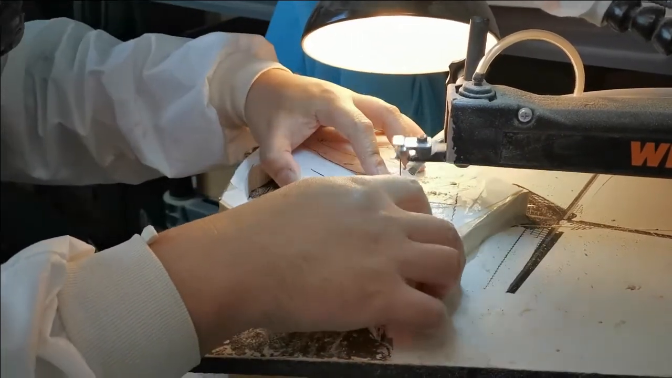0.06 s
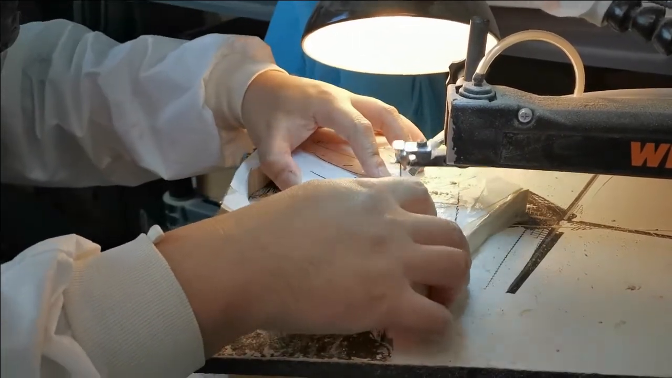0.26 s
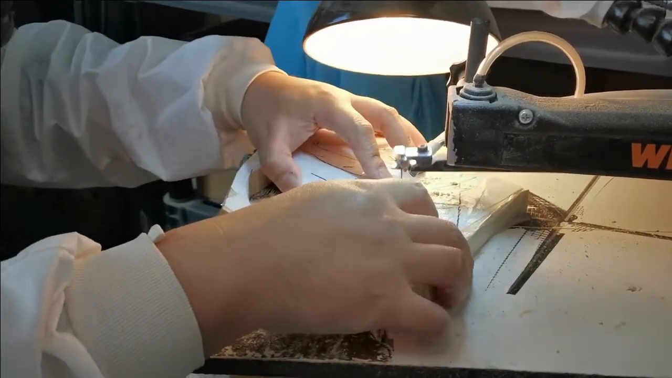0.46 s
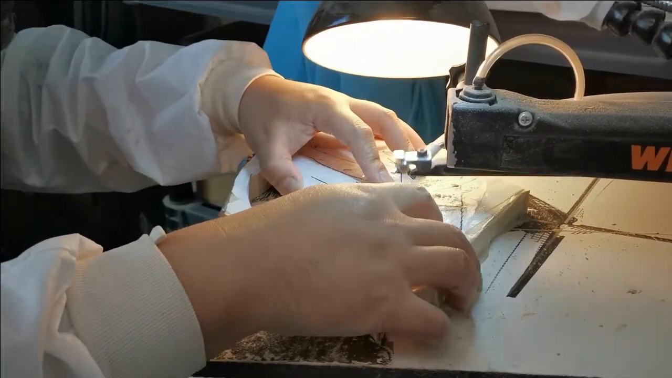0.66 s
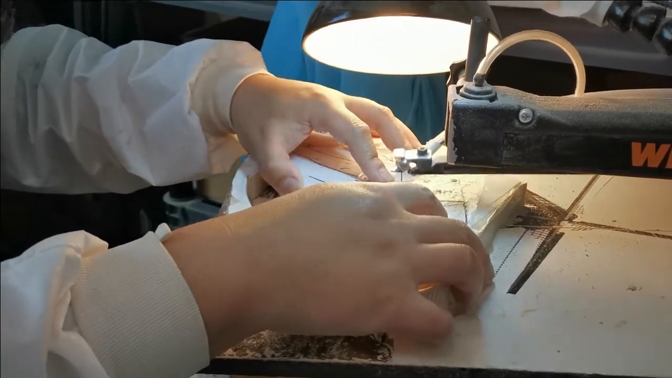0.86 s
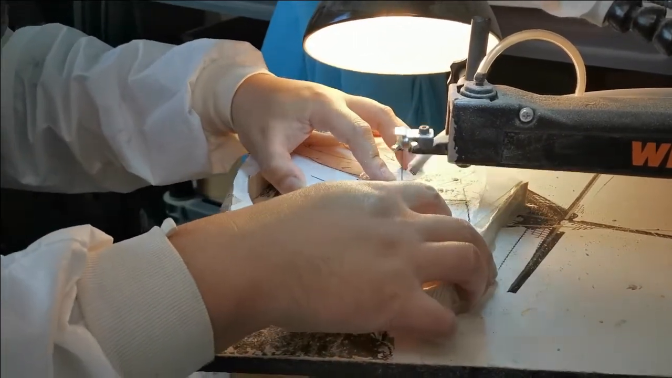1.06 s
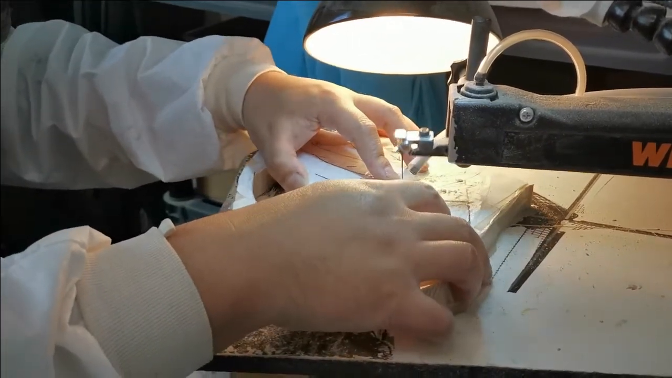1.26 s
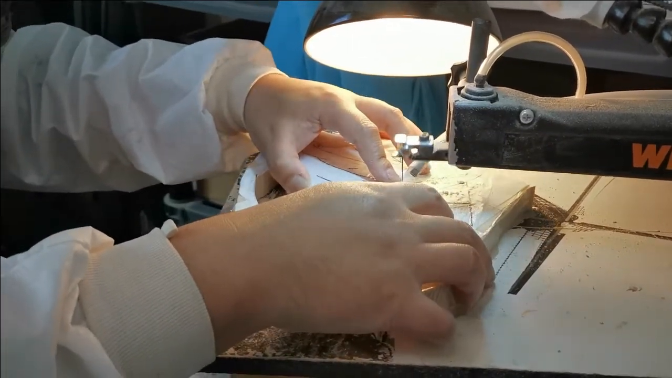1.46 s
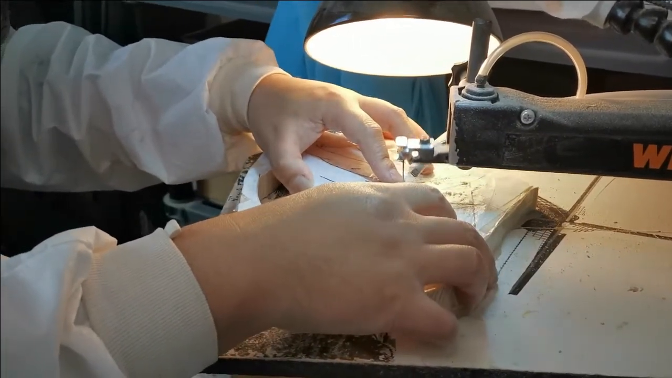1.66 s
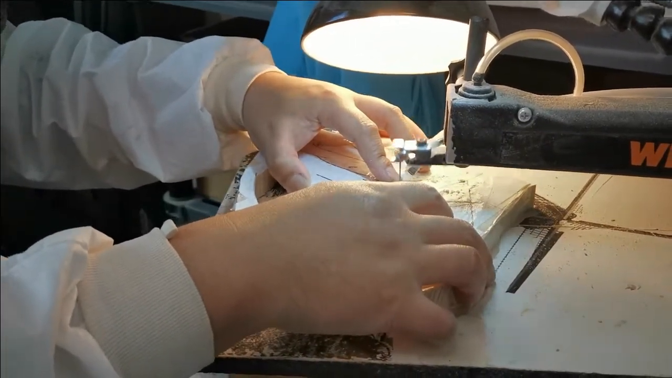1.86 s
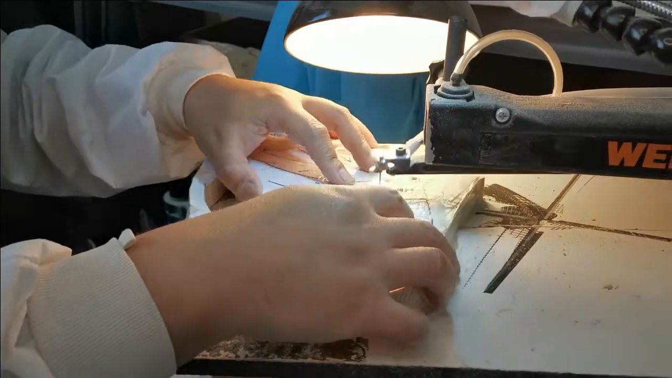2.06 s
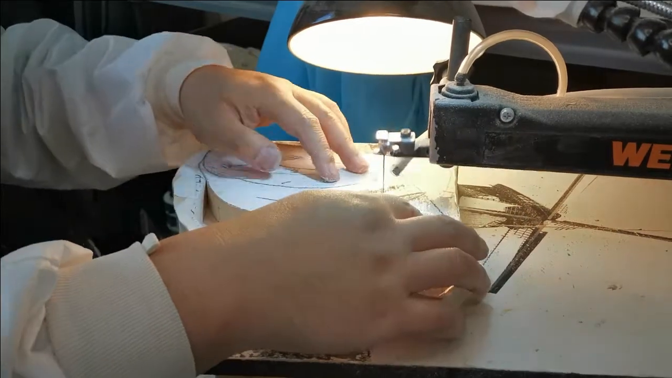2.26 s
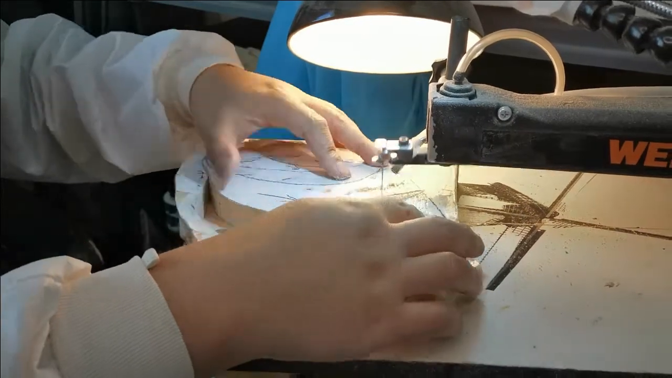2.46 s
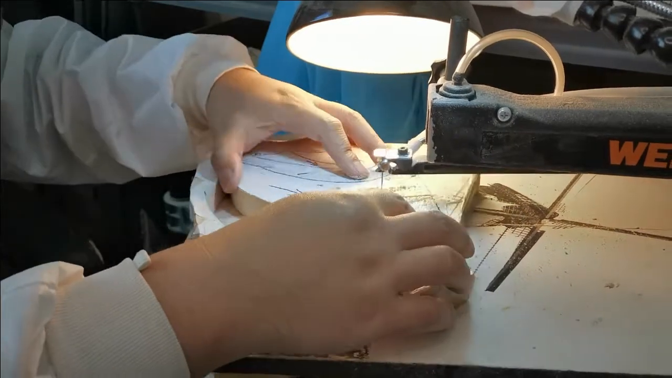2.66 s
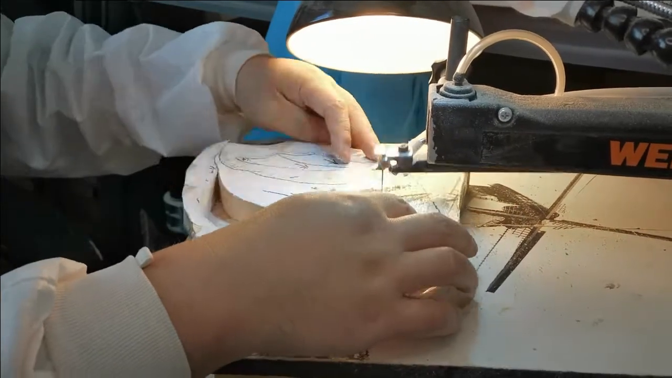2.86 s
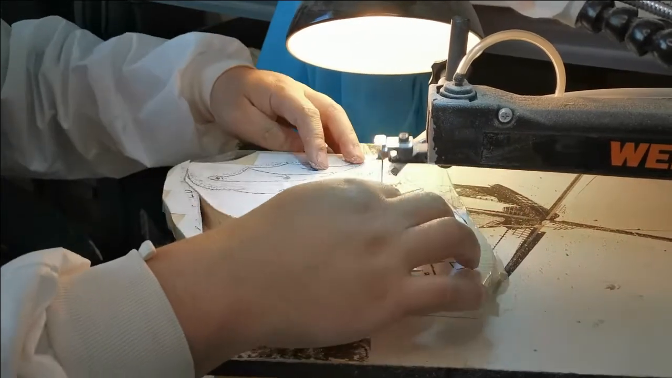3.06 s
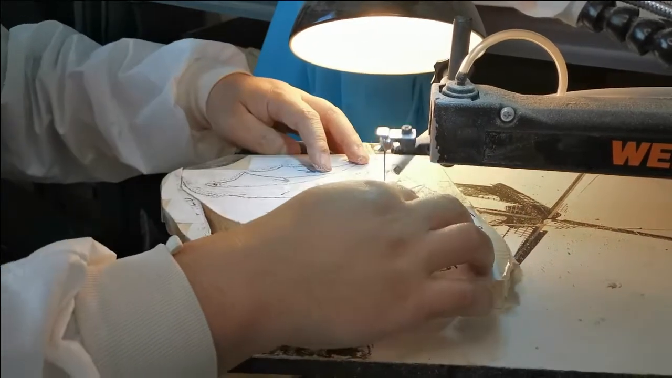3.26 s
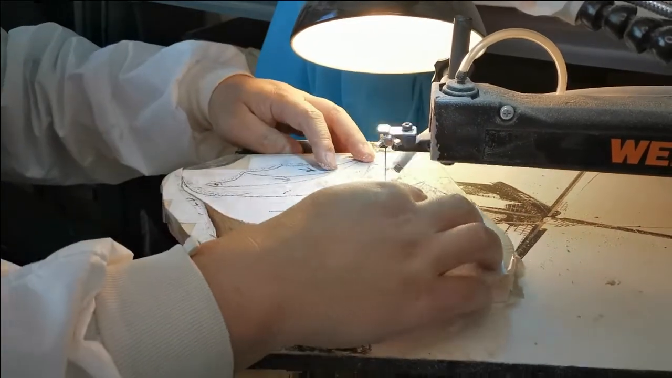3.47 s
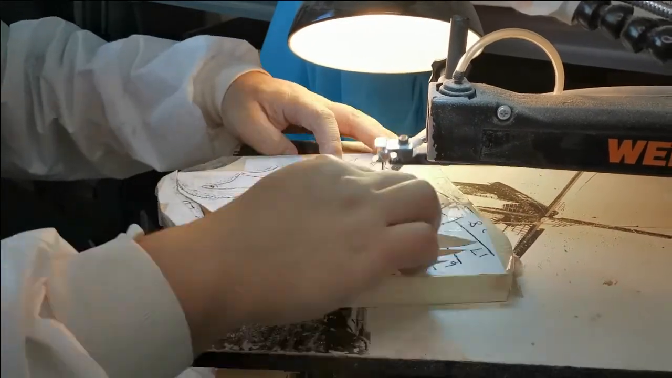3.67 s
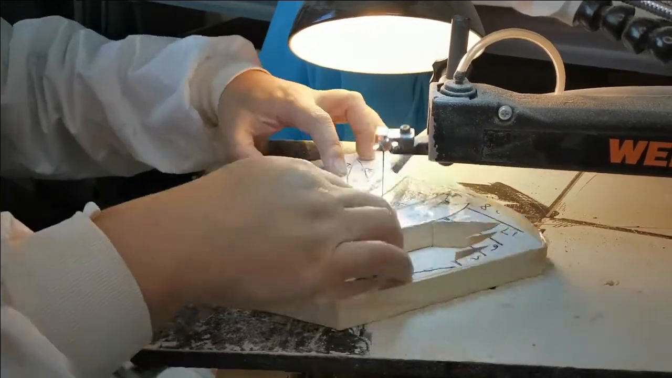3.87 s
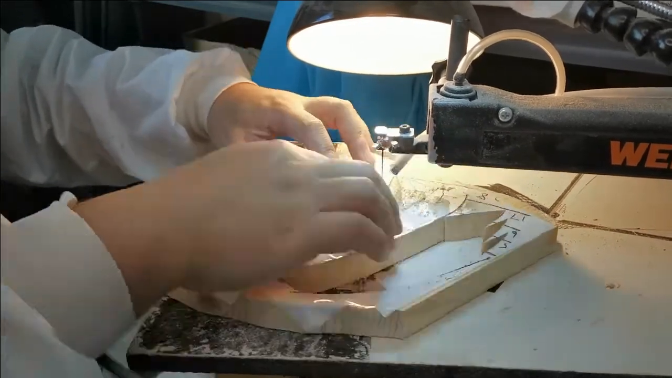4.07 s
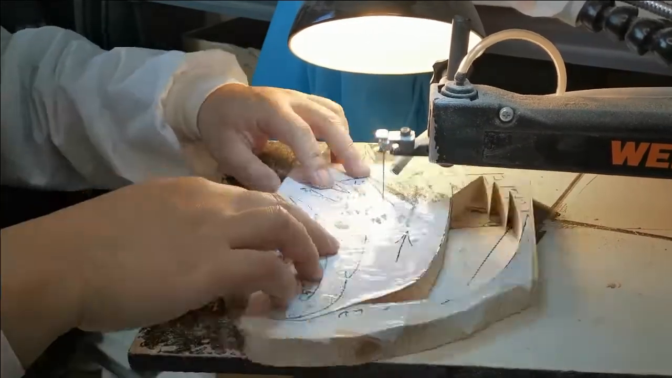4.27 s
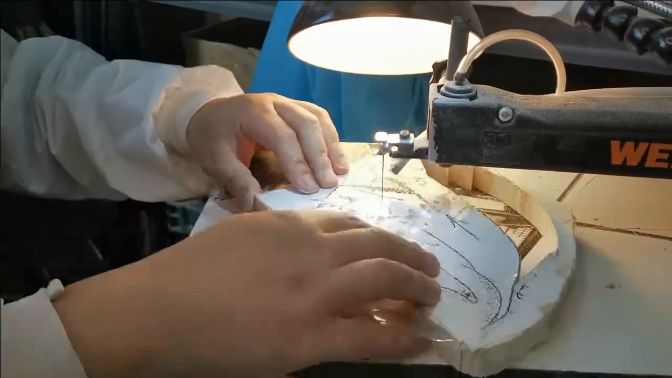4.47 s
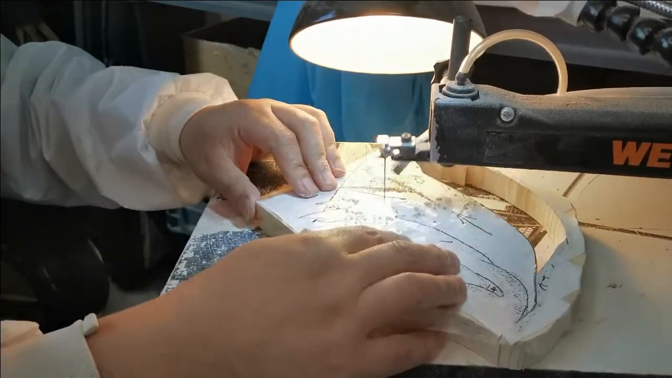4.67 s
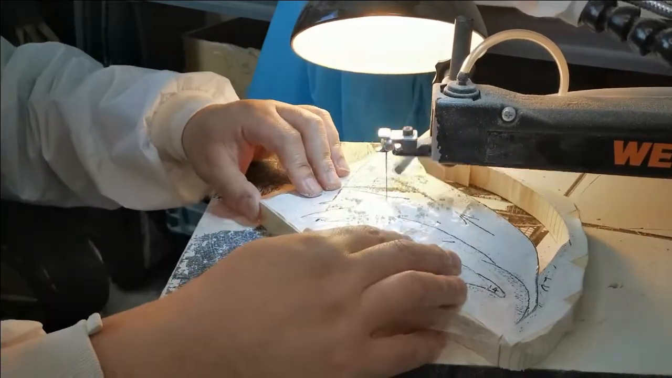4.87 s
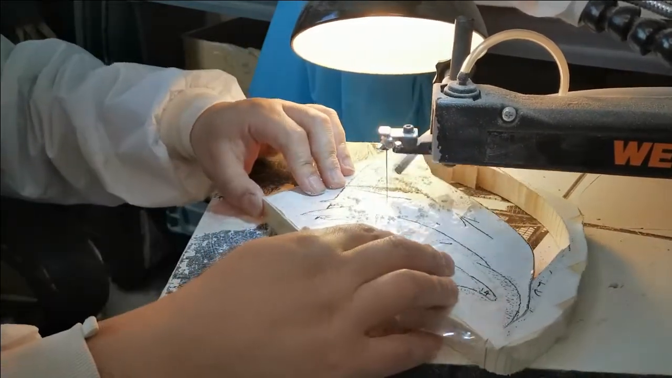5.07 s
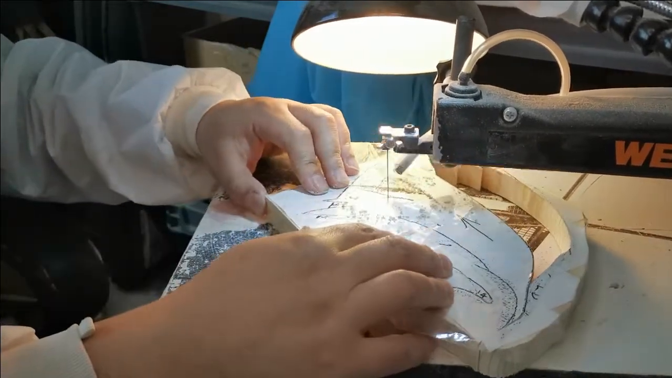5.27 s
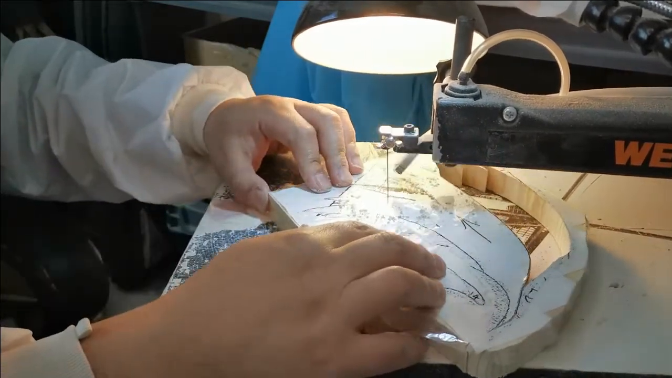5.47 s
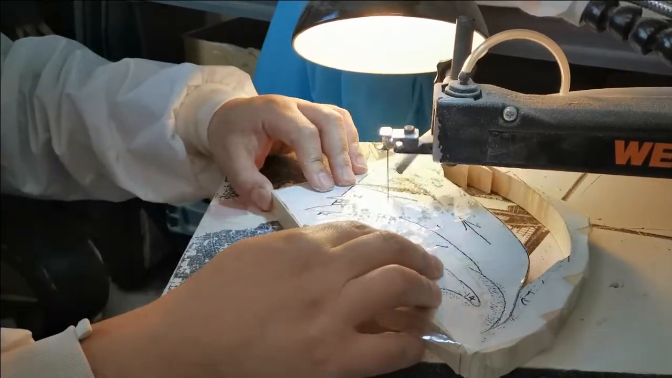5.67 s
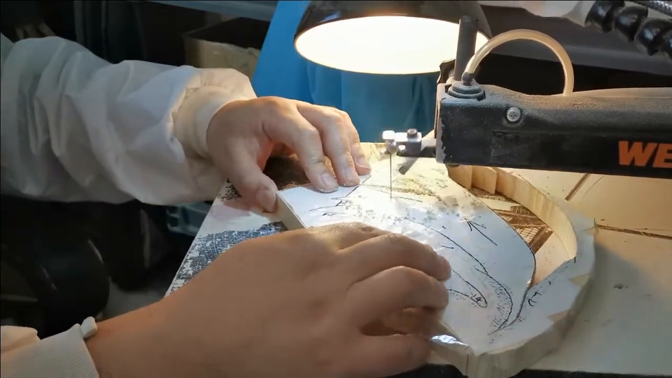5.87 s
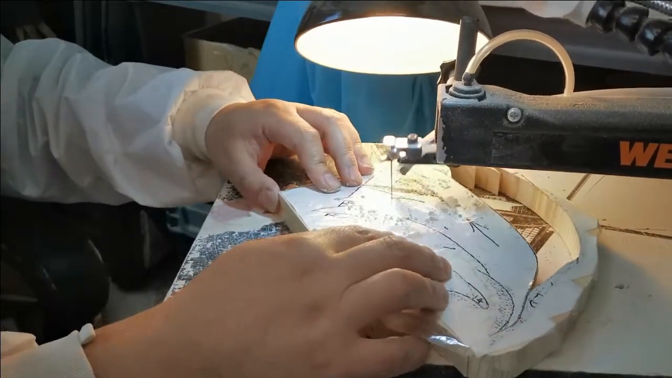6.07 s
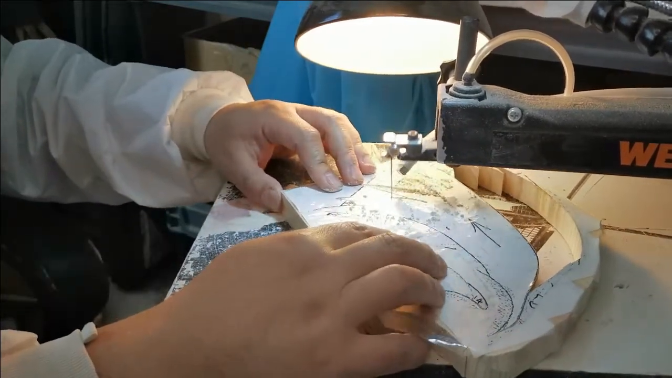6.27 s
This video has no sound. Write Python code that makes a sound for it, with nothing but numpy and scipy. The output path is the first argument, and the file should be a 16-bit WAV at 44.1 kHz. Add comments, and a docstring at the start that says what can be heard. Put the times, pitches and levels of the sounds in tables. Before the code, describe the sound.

A scroll saw is already cutting a wooden board at the start, heard close up in a small workshop. It makes a bright, gritty, buzzing rasp with a high hiss and a thin metallic ring from the blade. Underneath, the arm knocks so fast that it blends into a rattling hum, joined by a steady motor whine; both continue throughout.

At about 1.9 seconds the cut stops and the saw runs almost free and quieter. From 2 to 4.6 seconds the blade brushes the wood in short, uneven rasps, some with a ringing edge. The board scrapes softly on the metal table around 2.2 seconds, rubs with a hollow note at 3.2, and slides again from 3.8 to 4.8.

At about 4.7 seconds the blade bites in again. This cut is duller and fuller, swelling with each push and continuing until the end, near 6.3 seconds.

```python
"""A bright, buzzing rasp: a scroll saw is cutting a wooden board, close up in a small workshop.
It runs almost free while the board scrapes round on the table, then bites in again, duller.
On each downstroke the teeth rasp, shake the board and ring the blade. Underneath, the arm knocks at
both ends of its travel, fifty strokes a second, and the motor's chopped current sings."""
import sys
import numpy as np
from scipy import signal
from scipy.fft import rfft, irfft, next_fast_len
from scipy.io import wavfile
from scipy.ndimage import uniform_filter1d, map_coordinates

SR = 44100
rng = np.random.default_rng(int(sys.argv[2]) if len(sys.argv) > 2 else 0)


def digitize_waveform(pressure):
    """Quantize a signal to 16-bit integers and store it at the path in sys.argv[1].

    Rows of a 2-D input are taken as channels; values are limited to [-1, 1].
    """
    field = np.atleast_2d(pressure).T
    bounded = np.clip(field, -1, 1)
    quanta = np.round(bounded * 32767).astype(np.int16)
    wavfile.write(sys.argv[1], SR, quanta)


N = 278712
T = np.arange(N) / SR
FFT_SIZE = 2 * next_fast_len(N // 2 + 4096)
FREQ = np.maximum(np.arange(FFT_SIZE // 2 + 1) * SR / FFT_SIZE, 1)
SIDES = np.array([[1], [-1]])  # left, right

# The stereo image. Each row: frequency in Hz, likeness of the sides 0-1, left minus right in dB.
STEREO = [(40, .4, -2.5), (130, .75, -3.5), (350, .96, -3.3), (550, .95, -4.3), (1000, .88, -3.4),
          (2000, .85, -2), (4200, .88, -.5), (7000, .82, 0), (15000, .68, -3)]
# Unequal paths to the two sides. Each row: frequency in Hz, lead of the left in radians.
LEFT_LEAD = [(100, 0), (2000, -.65), (3450, -.4), (4130, -1.8), (4450, -1.1), (5500, -2.4), (7000, -.6),
             (8000, -2.4), (8700, -2), (11000, -1.2), (15000, -2)]
# Peaks and dips that colour the saw's noise, plus a thin whistle near 15.7 kHz.
# Each row: centre in Hz, width in Hz, lift in dB, left minus right in dB.
PEAKS_AND_DIPS = [(1018.5, 68, 12, -6), (1542, 52, 11.5, 7.5), (1814, 320, 4, -10), (2810, 404, 13.5, 4.5),
                  (3750, 74, 9.5, -3), (4578, 116, 8.5, -18), (6940, 110, 5.5, -6), (8100, 146, 5.5, 14.5),
                  (8557, 340, 10.5, -12.5), (9250, 300, 5.5, 0.5), (12000, 170, -5, 11),
                  (15750, 290, 13.5, 2)]
# Tone curves of the sources. Each row: frequency in Hz, gain in dB.
WHIRR_EQ = [(25, -99), (110, -96.5), (190, -100), (400, -93), (600, -81.5), (1000, -88), (3800, -107.5),
            (5100, -102.5), (6800, -94), (10000, -96), (15800, -94)]  # running machine and room
SCRAPE_EQ = [(100, -30), (220, -16.5), (320, -8.5), (450, -4.5), (680, 0), (810, -10.5), (1150, -6.5),
             (1700, -12), (2600, -3.5), (3400, -21), (8000, -27)]  # wood on steel
FRAME_EQ = [(50, -22), (150, -22.5), (250, -12), (345, 4.5), (450, 8), (550, 0.5), (650, -8), (750, -14),
            (850, -0.5), (950, -30), (1100, -10), (1400, -30), (3000, -14.5)]  # knocked frame
BOARD_EQ = [(100, -33), (200, -38), (330, 1.5), (520, -28.5), (700, -1.5), (800, -8), (1000, -2.5),
            (1280, -2.5), (2000, 1.5), (2500, -5.5), (3300, -6), (4200, 2.5), (5200, -26.5), (9000, -46)]  # shaken board
KEEN_EQ = [(1500, -14), (3500, -22), (5200, 3), (6500, 3), (9300, 6), (10500, -4.5), (12800, -8),
           (14000, -3), (15500, -7.5)]  # teeth shaving
DULL_EQ = [(1500, -15.5), (3500, -9), (5000, 2), (5800, 7.5), (7500, -2.5), (13500, 7), (15500, -4.5)]  # teeth rubbing
# The board slides on the table. Each row: middle in seconds, half length in seconds, level in dB.
SLIDES = [(2.243, 0.098, -52), (3.204, 0.15, -53.5), (3.957, 0.16, -49.5), (4.256, 0.11, -48),
          (4.373, 0.068, -49), (4.62, 0.26, -48)]
# Motor whine. Each row: multiple of the chopping rate, base levels in dB of the line, its lower
# sideband and its upper sideband, crank angle of its swell in turns.
WHINE = [(.5, -67, -90, -90, 0), (1, -70, -60, -56, .7), (2, -59, -67, -58.5, .05), (3, -65, -78, -70, .1),
         (4, -61, -63, -63, .15), (6, -58, -54.5, -53.5, .31)]
# The crank sags under load. Each row: time in seconds, speed in strokes per second.
CRANK_SPEED = [(0, 50.043), (0.4, 49.861), (1.85, 49.861), (2.1, 50.395), (2.9, 50.51), (3.3, 50.111),
               (3.8, 50.402), (4.4, 49.91), (5.0, 49.949), (5.6, 49.844)]
# Blade meets wood. Each row: start in seconds, length in seconds, load in dB (0 is a full cut),
# base rasp level in dB, extra ring in dB.
CUTS = [(-.1, 2.016, 0, -36.5, 0.5), (4.668, 1.8, -1.5, -41.5, 0.5)]  # the two long cuts
NUDGES = [(2.035, 0.058, -9, -49, 0), (2.19, 0.086, -11, -48.5, -2), (2.28, 0.23, -8, -42.5, 5.5),
          (2.6, 0.11, -10, -50, 12), (2.99, 0.098, -10, -49.5, 5), (3.14, 0.53, -8, -41.5, -3),
          (3.89, 0.2, -5, -44.5, -11), (4.17, 0.16, -5.5, -48.5, 1), (4.315, 0.15, -0.5, -41, -6.5),
          (4.48, 0.17, -3, -45, -10)]  # brushes as the board is turned
# The hands feed each long cut. Each row: time in seconds, dB over an ordinary push.
FIRST_FEED = [(0, -1), (.14, 1), (.3, 0.5), (.48, -3), (.72, 4.5), (.87, 3.5), (1.28, -1), (1.68, 3),
              (1.9, 1)]
SECOND_FEED = [(4.8, -0.5), (5.0, 6), (5.2, 6.5), (5.34, 4), (5.47, 7.5), (5.72, 7), (5.84, 5.5), (5.91, 7),
               (6.02, 5.5), (6.22, 8.5), (6.32, 5.5)]
# How the teeth bite. Each row: time in seconds, keenness from 0 (dull rub) to 1 (bright shaving).
KEENNESS = [(0, 0.95), (1.88, 0.92), (2.0, 0.43), (4.3, 0.021), (5.0, 0.5), (6.32, 0.27)]
# Strokes on which the teeth catch. Each row: time in seconds, board accent in dB, ring accent in dB.
CATCHES = [(.074, -2.5, 6.5), (1.037, -1, 5), (.695, -1, 3.5), (1.457, 0, 6), (1.678, 3, 1.5),
           (1.718, -1, 5), (1.798, 0.5, 6), (1.838, 0, 4.5), (2.435, 1, 16), (4.324, -4, 8), (4.344, 3, 8),
           (4.384, 1.5, 13), (4.404, 0, 16), (4.904, 1, 8), (5.044, -1, 5), (5.085, -1.5, 5.5),
           (5.165, -3.5, 9), (5.445, 0.5, 6), (5.507, 2.5, 4.5), (5.646, 2.5, 6), (5.706, 2, 5),
           (5.828, 0.5, 7.5), (6.208, 0, 6), (6.268, 4.5, -5), (6.288, 3, 4)]
# Hiss in the keen cut. Each row: time in seconds, centre in Hz, level in dB against the keen rasp.
SIZZLE = [(0, 11400, -4), (1.0, 10800, -9.5), (1.5, 9840, -15), (1.85, 9340, -11.5), (2.1, 9470, -22)]

# How each layer follows the work: base level in dB, dB per dB of load, dB per dB of feed.
KNOCK_LAW, BOARD_LAW, RING_LAW = (-44, 0.84, 0.087), (-39, 1.65, 1.436), (-44.5, 2.15, 1.45)
# When each sound is driven within a stroke: start, rise and length, all in turns of the crank.
PUSH, PLUCK, CLACK = (-.06, .015, .52), (-.05, .04, .3), (.56, .03, .12)
SHAVE, RUB = (-.025, .01, .34), (-.03, .025, .3)
REVERSAL = -.07  # crank angle at the top of the stroke, in turns
CUT_EDGES_S, NUDGE_EDGES_S = (.016, .01), (.007, .007)  # attack, release


def amp(db):
    """Decibels to gain."""
    return 10 ** (np.asarray(db) / 20)


def curves(table):
    """Each column of a table as a line through time."""
    seconds, *columns = np.transpose(table)
    return [np.interp(T, seconds, column) for column in columns]


def shape(table, column=1):
    """One column of a table as a line over log frequency."""
    rows = np.array(table)
    return np.interp(np.log(FREQ), np.log(rows[:, 0]), rows[:, column])


def unit(x):
    """Scale a stereo sound so that its middle has rms 1."""
    return x / np.std(x.mean(0))


def colour(x, db=0):
    """Minimum-phase EQ, then the level and phase differences that place a sound in stereo."""
    cepstrum = irfft(np.log(amp(db + SIDES * shape(STEREO, column=2) / 2)))
    cepstrum[:, 1:FFT_SIZE // 2] *= 2
    cepstrum[:, FFT_SIZE // 2 + 1:] = 0
    response = np.exp(rfft(cepstrum) + .5j * SIDES * shape(LEFT_LEAD))
    return irfft(rfft(x, FFT_SIZE) * response)[:, :N]


def noise():
    """White stereo noise, most alike on the two sides in the low mids."""
    alike = shape(STEREO)
    mid, side = rfft(rng.standard_normal((2, FFT_SIZE)))
    return irfft(mid * np.sqrt((1 + alike) / 2) + SIDES * side * np.sqrt((1 - alike) / 2))[:, :N]


def wander(rate_hz):
    """Smooth random drift with a spread near 1."""
    steps = rng.standard_normal(N // 4)
    return np.sqrt(3 / 2) * np.interp(T * rate_hz, np.arange(len(steps)), steps)


def mode_db(hz, width_hz):
    """The tone curve of a single resonance."""
    return -20 * np.log10(1 + ((FREQ - hz) / width_hz) ** 2)


def peaks_db():
    """The peaks and dips as one tone curve for each side."""
    return sum((db + SIDES * pan_db / 2) / (1 + (2 * (FREQ - hz) / width_hz) ** 2) ** 0.66
               for hz, width_hz, db, pan_db in PEAKS_AND_DIPS)


def held(start, length, attack, release):
    """A contact swells, holds and lets go."""
    swell = 1 + np.tanh((T - start) / attack / 2)
    let_go = 1 + np.tanh((start + length - T) / release / 2)
    return swell * let_go / 4


def contact(ease_db=-3.5, idle_load_db=-22, idle_rasp_db=-58):
    """Load, rasp gain and extra ring in dB: cuts hold steady, the hands ease off over each nudge."""
    load, rasp, zing_db = 0, 0, 0
    for table, edges, fade_db in ((CUTS, CUT_EDGES_S, 0), (NUDGES, NUDGE_EDGES_S, ease_db)):
        for start, length, load_db, rasp_db, extra_db in table:
            gate = held(start, length, *edges)
            touch = gate * amp(fade_db * np.clip((T - start) / length, 0, 1))
            load += amp(load_db) * touch
            rasp += amp(rasp_db) * touch
            zing_db += extra_db * gate
    return np.hypot(load, amp(idle_load_db)), np.hypot(rasp, amp(idle_rasp_db)), zing_db


def feeding():
    """The push of the hands in dB, which varies only during the two long cuts."""
    return sum(curves(feed)[0] * held(*cut[:2], *CUT_EDGES_S)
               for cut, feed in zip(CUTS, (FIRST_FEED, SECOND_FEED)))


def stroke_envelope(turn, timing, tail_s, drag_db):
    """One dying burst a turn, over the drag of the blade, which eases at each reversal."""
    start, rise, length = timing
    since = (turn - start) % 1
    power = np.minimum(since / rise, 1) * (since < length) * (1 - since / length / 2)
    decay = np.exp(-1 / (tail_s * SR))
    burst = signal.lfilter([1 - decay], [1, -decay], power)
    drag = 1 - .5 * np.cos(4 * np.pi * (turn - REVERSAL))
    return np.sqrt(burst + drag * amp(drag_db) ** 2)


def stroke_force(turn, scatter_db, accents_db):
    """Each stroke meets different grain; on some the teeth catch."""
    stroke = np.floor(turn - REVERSAL).astype(int) + 1
    db = scatter_db * rng.standard_normal(N // 100)
    for (at_s, _, _), accent_db in zip(CATCHES, accents_db):
        db[stroke[int(at_s * SR)]] = accent_db
    return uniform_filter1d(amp(db)[stroke], size=40)


def tooth_texture(turn, memory, loose_db):
    """The same teeth pass on every stroke, so their noise nearly repeats; loose fibres add more."""
    points = SR // 50  # per stroke
    fresh = rng.standard_normal((int(turn[-1]) + 20, points))
    pattern = signal.lfilter([np.sqrt(1 - memory ** 2)], [1, -memory], fresh, axis=0).ravel()
    fibres = np.diff(noise(), prepend=0)  # rises towards the treble
    return map_coordinates(pattern, [(turn + 10) * points], order=3) + amp(loose_db) * fibres


def workshop(hum_hz=100, hum_db=-78):
    """The bed: a steady whirr of the machine, with a trace of mains hum."""
    whirr = colour(noise(), shape(WHIRR_EQ) + 0.58 * peaks_db()) * np.sqrt(SR / 2)
    hum = np.sqrt(2) * np.sin(2 * np.pi * hum_hz * T)
    return whirr + amp(hum_db) * hum


def sliding(rough_db=3.0):
    """Wood scrapes over the steel table as the hands swing the board round."""
    push = sum(amp(db) * np.exp(-((T - at_s) / half_s) ** 2) for at_s, half_s, db in SLIDES)
    friction = noise() * amp(rough_db * wander(150))
    return push * unit(colour(friction, shape(SCRAPE_EQ)))


def hollow_rub(at_s=3.21, half_s=0.077, level_db=-49):
    """Pressed down as it turns, the board rubs with a hollow note."""
    swell = np.exp(-((T - at_s) / half_s) ** 2)
    return amp(level_db) * swell * unit(colour(noise(), mode_db(hz=1450, width_hz=300)))


def motor(turn, knock_db, chop_hz=480.15, waver_db=1.0, skirt_db=-18):
    """Chopped current sings in the windings, pulsing with the crank; load swells the low notes."""
    whine = np.zeros((2, N))
    load_db = np.maximum(knock_db + 54.5, 0)
    for multiple, line_db, lower_db, upper_db, angle in WHINE:
        hz = multiple * chop_hz
        levels = (lower_db + skirt_db, lower_db, line_db, upper_db, upper_db + skirt_db)
        phase = hz * T + rng.random()
        # line and sidebands beat, throbbing in step with the crank
        tone = sum(amp(db) * np.sin(2 * np.pi * (phase + sideband * (turn - angle)))
                   for sideband, db in enumerate(levels, start=-2))
        swell_db = 0.46 * load_db / (1 + (hz / 1600) ** 4)
        whine += np.sqrt(2) * tone * amp(swell_db + waver_db * wander(16))
    return colour(whine)


def arm_knock(turn, return_share=0.74, return_turns=.497, rough_db=1.53):
    """The arm reverses twice a turn; the two opposite knocks ring the frame."""
    knocks = 0
    for angle, size in ((0, 1), (return_turns, -return_share)):
        count = np.floor(turn - angle)
        knocks += size * np.diff(count, prepend=count[0])
    return unit(colour(knocks * amp(rough_db * wander(60)), shape(FRAME_EQ)))


def board_rattle(turn, scatter_db=2.2):
    """The upstroke lifts the board, which clacks unevenly against the table."""
    size = amp(scatter_db * rng.standard_normal(N // 100))[np.floor(turn).astype(int) + 1]
    clack = size * stroke_envelope(turn, CLACK, tail_s=.001, drag_db=-20)
    texture = tooth_texture(turn, memory=.9, loose_db=-5)
    return unit(colour(texture * clack, mode_db(hz=1000, width_hz=170)))


def tooth_chatter(turn, teeth_per_stroke=10.6, slip_teeth=.22):
    """Teeth strike the wood in turn: their rate rises and falls with the speed of the blade."""
    travel = (1 - np.cos(2 * np.pi * (turn - REVERSAL))) / 2
    return np.sqrt(2) * np.sin(2 * np.pi * (teeth_per_stroke * travel + slip_teeth * wander(130)))


def board_shake(turn, grit, keen, accents_db, chatter_db=-8):
    """The body of the cut: tearing fibres and striking teeth shake the board."""
    force = stroke_force(turn, scatter_db=1.1, accents_db=accents_db)
    # a dull cut has less drag between bites, so its jolts stand out
    push = force * stroke_envelope(turn, PUSH, tail_s=.0013, drag_db=-7.7 + 5.5 * keen)
    fibres = tooth_texture(turn, memory=0.81, loose_db=9) * grit
    tearing = unit(colour(fibres * push, shape(BOARD_EQ) + peaks_db()))
    chatter = unit(colour(tooth_chatter(turn) * push ** 2, shape(BOARD_EQ) + 0.93 * peaks_db()))
    return unit(tearing + amp(chatter_db) * chatter)


def blade_ring(turn, accents_db, hz=4480, detune=.007, peak_turns=.29, half_turns=.165):
    """Each downstroke bows the taut blade into a short ping, with a fainter, noisy shiver."""
    since = (turn - REVERSAL) % 1
    stroke = (turn - REVERSAL + 1).astype(int)
    stroke_hz = hz * (1 + detune * rng.standard_normal(N)[stroke])
    tone = np.sin(2 * np.pi * stroke_hz * since / curves(CRANK_SPEED)[0])
    swell = np.exp(-((since - peak_turns) / half_turns) ** 2)
    ping = unit(colour(swell * tone))
    pluck = stroke_envelope(turn, PLUCK, tail_s=.0005, drag_db=-3.5)
    shiver = unit(colour(noise() * pluck, mode_db(hz, width_hz=135)))
    return unit(ping + amp(-6) * shiver) * stroke_force(turn, scatter_db=1.9, accents_db=accents_db)


def sizzle(shave, width_hz=1500):
    """A band of hiss that pulses with the teeth and sinks in pitch along the first cut."""
    centre_hz, level_db = curves(SIZZLE)
    low_noise = signal.sosfilt(signal.butter(3, width_hz / 2, fs=SR, output="sos"), noise())
    band = low_noise * np.cos(2 * np.pi * np.cumsum(centre_hz) / SR)
    return unit(band * shave) * amp(level_db)


def tooth_rasp(turn, grit, keen, accents_db):
    """Teeth hiss in the kerf in gritty bursts; keenness crossfades a dull rub into bright shaving."""
    force = grit * stroke_force(turn, scatter_db=1.1, accents_db=accents_db)
    shave = force * stroke_envelope(turn, SHAVE, tail_s=.0011, drag_db=-11.5)
    rub = force * stroke_envelope(turn, RUB, tail_s=.002, drag_db=-6)
    shaving = unit(colour(noise() * shave, shape(KEEN_EQ) + peaks_db()))
    bright = unit(shaving + sizzle(shave))
    dull = unit(colour(noise() * rub, shape(DULL_EQ) + 1.08 * peaks_db()))
    return np.sqrt(keen) * bright + np.sqrt(1 - keen) * dull


def scene():
    """One crank drives the arm, the motor's throb and the cut; load and feed ride their levels."""
    turn = np.cumsum(curves(CRANK_SPEED)[0]) / SR - .5
    load, rasp_gain, zing_db = contact()
    feed_db, keen = feeding(), curves(KEENNESS)[0]
    knock_db, board_db, ring_db = (db + per_load * 20 * np.log10(load) + per_feed * feed_db
                                   for db, per_load, per_feed in (KNOCK_LAW, BOARD_LAW, RING_LAW))
    # a keen cut shakes the board less; a faint tremor stays when the blade runs free
    board_gain = np.hypot(amp(board_db - 3.5 * keen), amp(-52.5))
    knocks = (arm_knock(turn) + amp(-9) * board_rattle(turn)) * amp(knock_db)
    whine = motor(turn, knock_db)
    _, jolts_db, pings_db = np.transpose(CATCHES)
    grit = amp(2.1 * wander(3500))  # tearing fibres roughen board and rasp together
    board = board_shake(turn, grit, keen, jolts_db) * board_gain
    ring = blade_ring(turn, pings_db) * amp(ring_db + zing_db)
    rasp = tooth_rasp(turn, grit, keen, 0.24 * pings_db) * rasp_gain * amp(0.61 * feed_db)
    return knocks + whine + board + ring + rasp + sliding() + hollow_rub() + workshop()


def record(dry, top_hz=15850):
    """A steep low-pass takes off the very top."""
    return signal.sosfilt(signal.ellip(12, .2, 80, top_hz, fs=SR, output="sos"), dry)


dry = scene()
out = record(dry)
digitize_waveform(out)
```